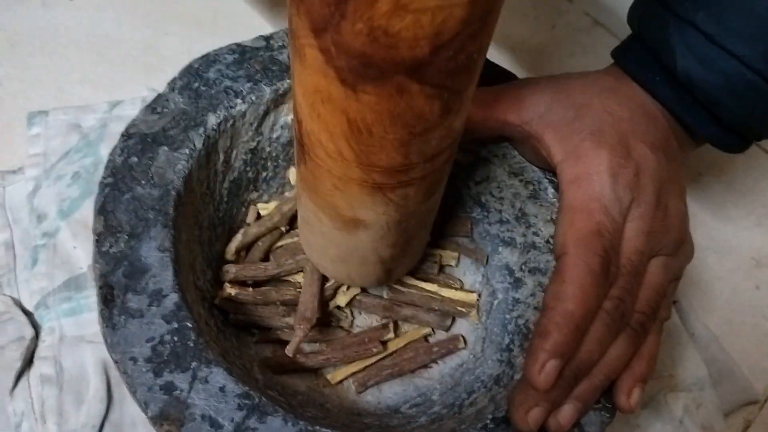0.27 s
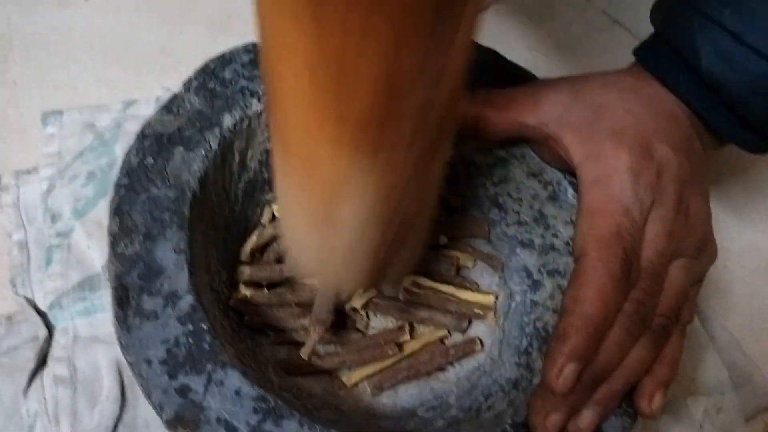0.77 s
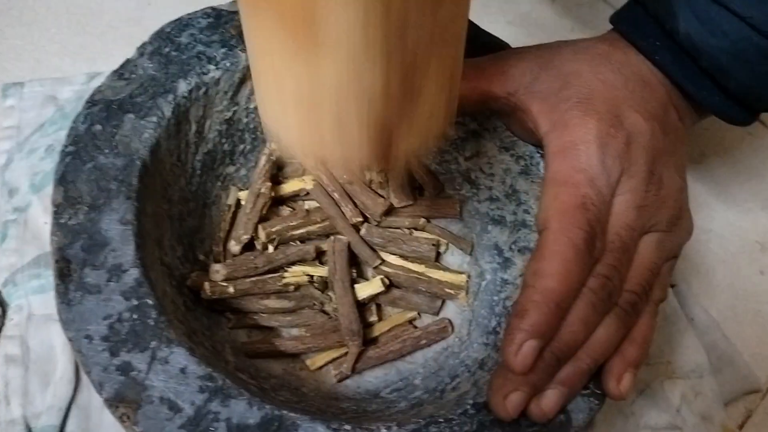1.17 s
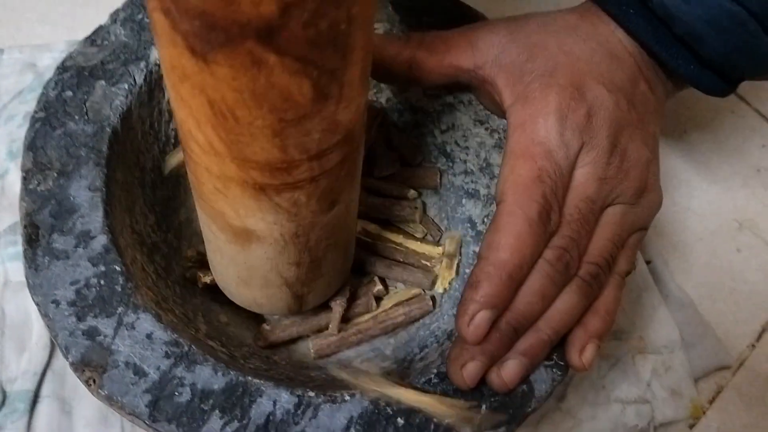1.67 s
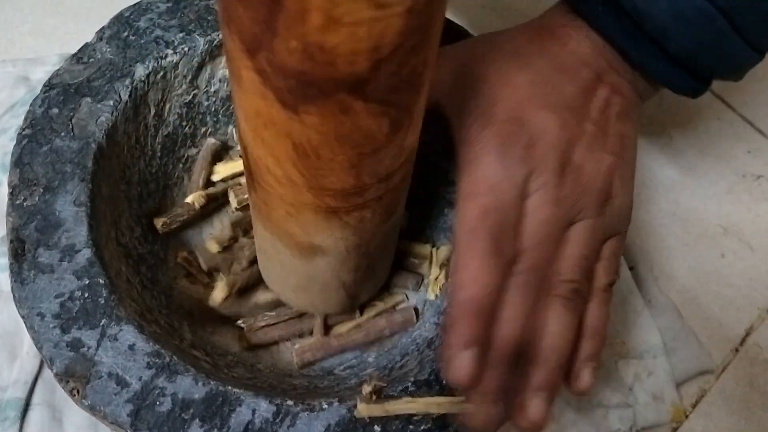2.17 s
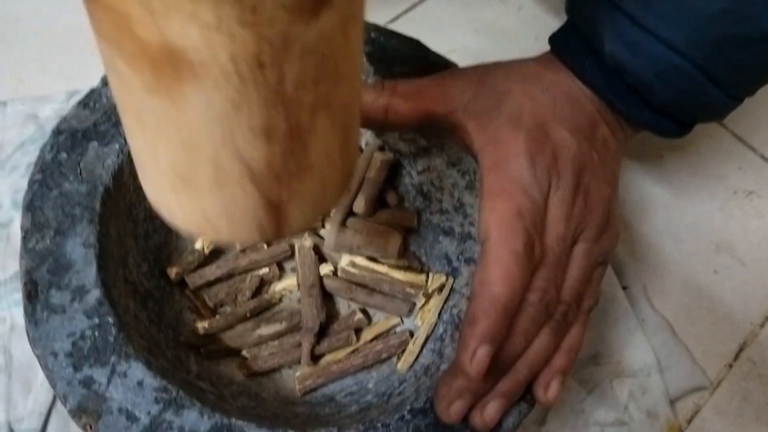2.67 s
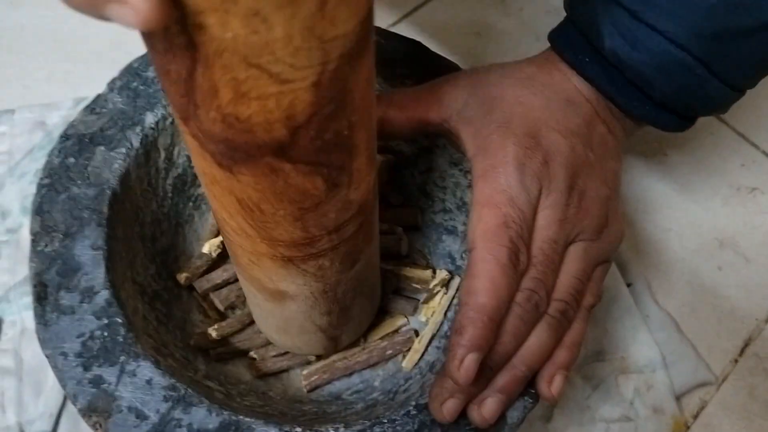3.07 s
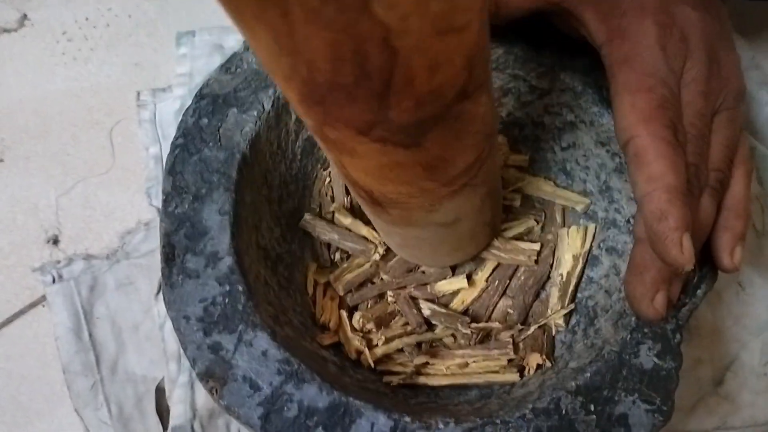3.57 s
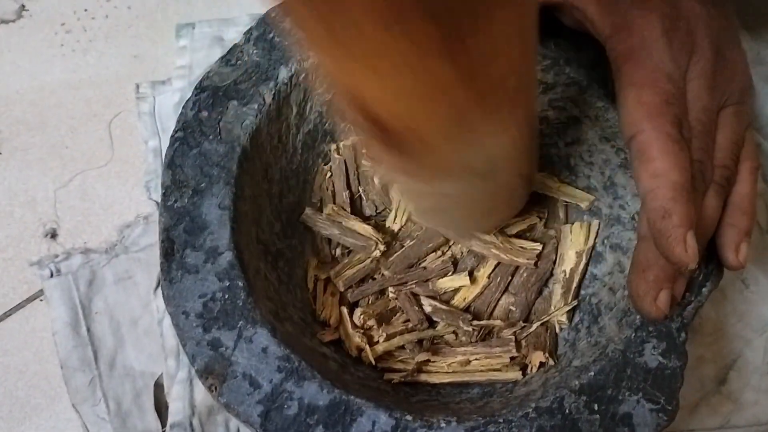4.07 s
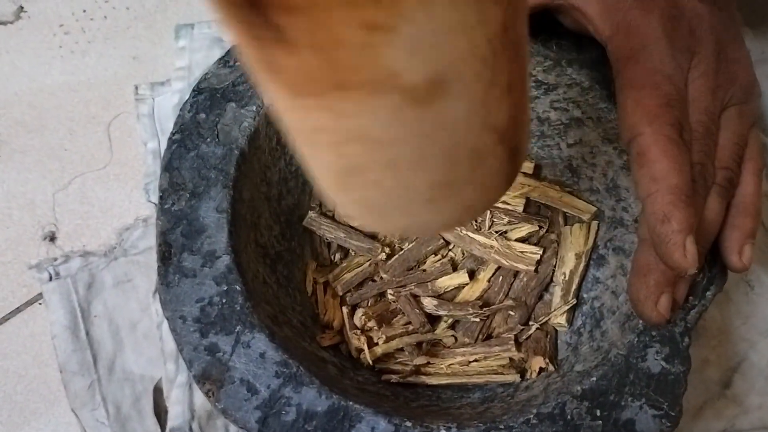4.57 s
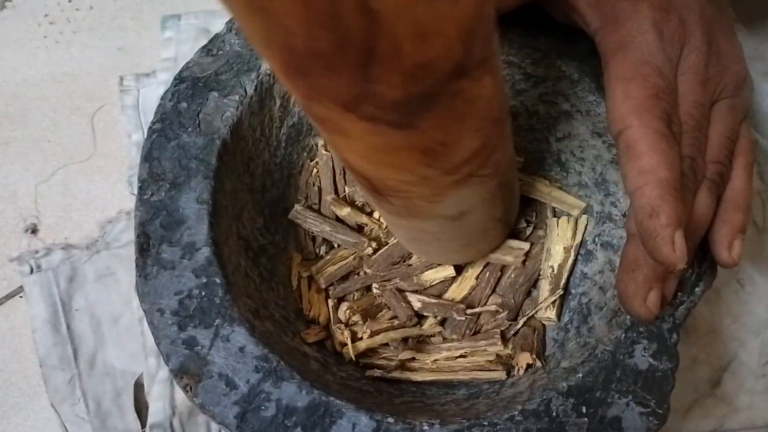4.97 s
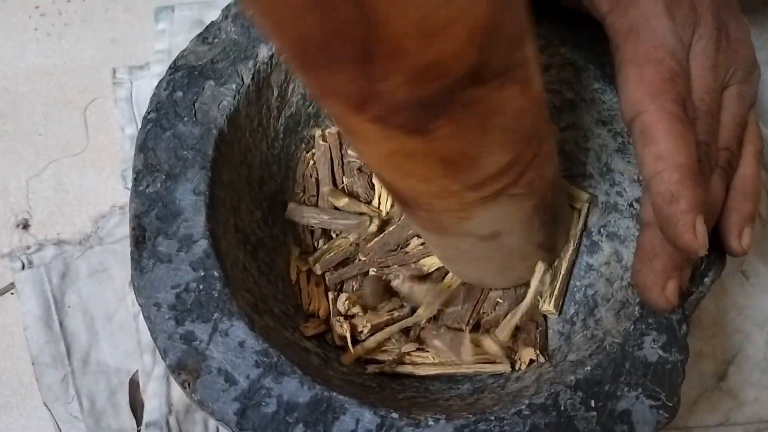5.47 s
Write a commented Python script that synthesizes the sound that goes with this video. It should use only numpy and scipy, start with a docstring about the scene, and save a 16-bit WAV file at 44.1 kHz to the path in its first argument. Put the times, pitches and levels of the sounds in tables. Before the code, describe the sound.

Steady pestle blows crack dry woody sticks in a stone bowl in a hard-walled kitchen, turning fuller and duller after a short dead silence.

```python
"""A hard-walled kitchen: on its floor a heavy wooden pestle pounds dry sticks in a stone mortar, three blows in 2 s.
Each blow is a rustle and crack (dense random clicks), a slap and ringing (decaying sines), and a floor thud (low
sines and noise); a noise tail is the room's answer. Loose sticks clatter over low rumble and soft hiss.
After a silent pause the sticks are splintered and cushion the pestle: shorter, duller cracks and a fuller thud."""
import sys
import numpy as np
from scipy import signal
from scipy.fft import rfft, irfft
from scipy.io import wavfile
from scipy.ndimage import uniform_filter1d, minimum_filter1d

SR = 44100
rng = np.random.default_rng(int(sys.argv[2]) if len(sys.argv) > 2 else 0)


def output_pcm(signal):
    """Save a mono or channel-first signal as 16-bit PCM at the path in sys.argv[1].

    Samples are clipped to [-1, 1] before scaling.
    """
    pcm = np.clip(np.atleast_2d(signal).T, -1, 1) * 32767
    wavfile.write(sys.argv[1], SR, np.round(pcm).astype(np.int16))


N = 252693
TIME = np.arange(N) / SR   # s
AGE = TIME[:SR]   # s since a sound began; each single sound lasts at most 1 s
PAUSE_START_S, PAUSE_END_S = 3.535, 4.056

# the blows; the ring is loud where the pestle gets through to the stone, the slap where it lands flat on the heap;
# levels are relative within each layer: (time [s], crack level [dB], crack t60 [s], slap level [dB],
# knock pitch [Hz], knock level [dB], lingering knock level [dB], ring level [dB], thud level [dB], boom top [Hz])
BLOWS = [ (-.30, -15, .05, -5, 733, -7, -26, -9, -28, 200),
         (0.4160, -16, .035, -3.5, 730.4, -3, -31, -13.5, -32, 199.2),
         (1.141, -14, .069, 4, 702.3, -6.5, -25.5, 1, -33, 195.7),
         (1.7909, -16, .097, -2, 728, -11, -33, 1.5, -32.5, 455),
         (2.4680, -9.5, .027, -12, 713, -12, -36, 4, -29.5, 195.7),
         (3.198, -15, .052, -9, 738.4, -14, -29.5, 4, -24, 261),
         (3.7300, -23, .016, 5, 719, -5.5, -8.5, -38, -15.5, 990),
         (4.3925, -13, .017, 18.5, 725.5, 1, -7, -44, -16.5, 1030),
         (5.0673, -14.5, .0082, 16.5, 699, -1.5, -24.5, -8, -12, 446)]


def from_db(db):
    """Decibels to gain."""
    return 10 ** (np.asarray(db) / 20)


def rms_one(x):
    """Scale to rms 1."""
    return x / np.sqrt(np.mean(x ** 2) + 1e-20)


def fade(t60):
    """An envelope that falls 60 dB in t60 seconds (1 ms at least)."""
    return np.exp(-np.log(1000) * AGE / max(t60, 1e-3))


def butter(x, hz, kind, order):
    """Causal Butterworth filter."""
    sections = signal.butter(order, np.clip(hz, 10, .45 * SR), kind, fs=SR, output="sos")
    return signal.sosfilt(sections, x)


def colour(x, spectrum):
    """Causal (minimum-phase) filter with the given spectrum, by folding its cepstrum."""
    size = 4096
    hz, db = np.transpose(spectrum)
    bins_hz = np.arange(size // 2 + 1) * SR / size
    bins_db = np.interp(np.log(bins_hz + 1), np.log(hz), db)
    cepstrum = irfft(np.log(from_db(bins_db)))
    cepstrum[1:size // 2] *= 2
    cepstrum[size // 2 + 1:] = 0
    impulse = irfft(np.exp(rfft(cepstrum)))
    return signal.fftconvolve(x, impulse[None], axes=1)[:, :x.shape[1]]


def stereo(pair, alike):
    """Two unrelated signals become left and right with the given likeness (correlation)."""
    alike = np.clip(alike, -1, 1)
    middle = np.sqrt(1 + alike) * pair[0]
    side = np.sqrt(1 - alike) * pair[1]
    return (middle + side * [[1], [-1]]) / np.sqrt(2)


def add(track, s, sound):
    """Mix a sound into the track at time s; it may have begun before the track does."""
    start = min(round(s * SR), N - 1)
    sound, start = sound[:, max(-start, 0):], max(start, 0)
    track[:, start:start + sound.shape[1]] += sound[:, :N - start]


def pan(pan_db):
    """Level offsets of left and right, in dB, from their difference."""
    return pan_db * np.array([[.5], [-.5]])


def mode(hz, db, t60, pan_db=0, lag=0, rise_s=0.0018):
    """A struck mode: a decaying sine that reaches the two microphones with different level and phase."""
    swing = np.sin(2 * np.pi * hz * AGE - np.array([[lag], [0]]))   # lag: left, in radians
    return from_db(db + pan(pan_db)) * swing * fade(t60) * (1 - np.exp(-AGE / rise_s))


def burst(grains, envelope):
    """Grains under an envelope, with the energy of that envelope."""
    return rms_one(grains * envelope) * np.sqrt(np.mean(envelope ** 2))


def fractures(spread_db=5.5, per_s=6000, alike=0.35, lag_samples=6):
    """Dense clicks of uneven size from breaking fibres, reaching the right microphone first."""
    # spectrum of breaking sticks: (frequency [Hz], relative level [dB])
    crack_spectrum = [(25, -32), (100, -6), (400, -2), (1100, -3), (2100, -3), (3100, 2.5), (4400, -1),
                      (5200, -4.5), (6000, -5.5), (6450, -20), (7100, -14), (8200, -31), (9500, -41),
                      (15000, -38.5)]
    sizes = from_db(spread_db * np.minimum(rng.exponential(1, (2, SR)), 3))
    sizes = sizes * rng.choice([-1, 1], (2, SR))
    clicks = sizes * (rng.random((2, SR)) < per_s / SR)
    left, right = colour(stereo(clicks, alike), crack_spectrum)
    return np.array([np.roll(left, int(lag_samples)), right])


def first_touch(length_s=.03, swell_db=38.0):
    """The heap rustles louder and louder as the pestle presses into it."""
    swell = from_db(swell_db * np.minimum(AGE / length_s - 1, 0))
    return burst(fractures(), swell * (AGE < length_s))


def crack(crush_s, t60, top_hz, crush_db=1.0):
    """Sticks give way under the pestle in a swelling crackle, which dies away once it bottoms out."""
    swell = from_db(crush_db) * np.minimum(2 * AGE / crush_s, 1)
    dying = np.interp(AGE - crush_s, AGE, fade(t60))
    envelope = np.where(AGE < crush_s, swell, dying)
    return burst(butter(fractures(), top_hz, "low", order=1), envelope)


def slap(lag_s=0.00013):
    """The pestle's flat face slaps the packed heap: heavily damped modes, lagging on the left."""
    # modes of the slap: (frequency [Hz], relative level [dB], t60 [s])
    slap_modes = [(1006, 2, 0.0048), (1360, -6.5, 0.002), (2598, -3.5, 0.0055), (3900, -15, 0.0066),
                  (5270, -13, 0.0016)]
    out = 0
    for k, (hz, db, t60) in enumerate(slap_modes):
        out = out + mode(hz, db, t60, 0, 2 * np.pi * hz * lag_s, rise_s=0.0006) * (-1) ** k
    return out


def hanging_tone(hz, db, pan_db, lag, spread, t60, count=12):
    """A mode's tone hangs on in the room as a cluster of close partials that waver."""
    steps = np.linspace(-1, 1, count) + rng.normal(0, 0.13, count)
    phases = rng.uniform(0, 2 * np.pi, count)
    cluster = sum(np.exp(-step ** 2 + 1j * (2 * np.pi * hz * (1 + spread * step) * AGE + phase))
                  for step, phase in zip(steps, phases))
    sides = np.real(cluster * np.exp(-1j * np.array([[lag], [0]])))
    envelope = fade(t60) * (1 - np.exp(-AGE / 0.037))
    return from_db(db + pan(pan_db)) * burst(sides, envelope) / np.sqrt(2)


def ringing(knock_hz, knock_db, linger_db, ring_db, overtones_db, scatter_db=2.0, overtone_lag=.9,
            bowl_cut_hz=520):
    """Pestle on mortar: quickly damped knock and ring, and faint tones that hang on; gives (stroke, lingering)."""
    # main ring: (frequency [Hz], t60 [s], left over right [dB], left lag [radians])
    ring_hz, ring_t60, ring_pan_db, ring_lag = (1832, 0.058, 2.9, 2.92)
    # overtones of the ring: (frequency [Hz], relative level [dB], t60 [s])
    overtones = [(2380, -8, 0.05), (2656, -2.5, 0.035), (3102, -2, 0.059), (3484, -7.5, 0.056),
                 (3850, -10, 0.049), (4580, -11, 0.044)]
    knock_t60_s, knock_pan_db, knock_lag = 0.066, -3.5, .35   # lag in radians
    knock = mode(knock_hz, knock_db, knock_t60_s, knock_pan_db, knock_lag, rise_s=0.0021)
    stroke = butter(knock, bowl_cut_hz, "high", order=3)   # a small bowl radiates little below its knock
    lingering = hanging_tone(knock_hz, linger_db, knock_pan_db, knock_lag, spread=0.094, t60=0.51)
    stroke += mode(ring_hz, ring_db, ring_t60, ring_pan_db, ring_lag)
    lingering += hanging_tone(ring_hz, ring_db - 30, ring_pan_db, ring_lag, spread=0.023, t60=0.45)
    for (hz, db, t60), chance_db in zip(overtones, rng.normal(0, scatter_db, len(overtones))):
        stroke += mode(hz, overtones_db + db + chance_db, t60, 0, overtone_lag)
    return stroke, lingering


def thud(low_hz, top_hz, modes_db=3.0, boom_db=-0.5, alike=0.63):
    """The floor takes the blow: a few low modes, and a diffuse boom of noise in the room."""
    # the floor under the mortar, before a little random scatter: (frequency [Hz], relative level [dB], t60 [s])
    floor_modes = [(96.16, 2, 0.44), (123.3, -5, .55), (171.5, -13.5, 0.67), (218, -4, 0.39),
                   (265, -9.5, 0.17), (364, -19.5, 0.16), (401, -11.5, 0.18)]
    boom_t60_s = 0.54
    luck = rng.normal(0, 1, (len(floor_modes), 2))
    slab = 0
    for k, ((hz, db, t60), (detune, chance)) in enumerate(zip(floor_modes, luck)):
        slab = slab + mode(hz * (1 + 0.015 * detune), db + 2 * chance, t60, rise_s=0.001) * (-1) ** k
    noise = stereo(rng.standard_normal((2, SR)), alike)
    boom = burst(butter(noise, top_hz, "low", order=3), fade(boom_t60_s))
    return butter(from_db(modes_db) * slab + from_db(boom_db) * boom, low_hz, "high", order=4)


def kitchen(x, gap_s=0.0055, bass_alike=0.28, treble_alike=0.11, split_hz=1000):
    """Hard walls answer with a dense decaying tail, more alike between the sides in the bass."""
    # colour of the room: (frequency [Hz], relative level [dB])
    room_spectrum = [(80, 0), (400, -11.5), (750, -5), (1300, -5), (2000, -5), (3300, -2.5), (6000, -8.5),
                     (8000, -6), (10000, -16)]
    room_t60_s = 0.56
    bass = butter(stereo(rng.standard_normal((2, SR)), bass_alike), split_hz, "low", order=2)
    treble = butter(stereo(rng.standard_normal((2, SR)), treble_alike), split_hz, "high", order=2)
    build_up = np.minimum(AGE / gap_s, 1) ** 2
    tail = rms_one((bass + treble) * fade(room_t60_s) * build_up) / np.sqrt(SR)
    return signal.fftconvolve(x, colour(tail, room_spectrum), axes=1)[:, :N]


def pounding(touch_s=0.02, touch_db=-26.5, slap_room_db=-19.5, ring_room_db=-11.0):
    """Every blow: rustle, crack, slap and ring with their room sound, over the thud."""
    # pairs: (whole sticks before the pause, splinters from its start on)
    crush_lengths_s = (0.0041, 0.0046)   # from first breaking to bottoming out
    crack_tops_hz, crack_rooms_db = (5316, 3215), (-1.5, -1.5)
    overtone_bases_db = (-13, -42.5)   # with the ring at 0 dB
    thud_lows_hz = (72, 154)
    overtones_follow = .42   # dB of overtones per dB of ring
    direct, sent = np.zeros((2, 2, N))
    for (s, crack_db, t60, slap_db, knock_hz, knock_db, linger_db, ring_db, thud_db, boom_top_hz) in BLOWS:
        heap = int(s > PAUSE_START_S)
        crush_s, room_db = crush_lengths_s[heap], crack_rooms_db[heap]
        overtones_db = overtone_bases_db[heap] + overtones_follow * ring_db
        stroke, lingering = ringing(knock_hz, knock_db, linger_db, ring_db, overtones_db)
        rustle = from_db(crack_db + touch_db) * first_touch(touch_s)
        breaking = from_db(crack_db) * crack(crush_s, t60, crack_tops_hz[heap])
        parts = [(s - crush_s - touch_s, rustle, room_db),
                 (s - crush_s, breaking, room_db),
                 (s, from_db(slap_db) * slap(), slap_room_db),   # the bowl beams the slap at the microphones
                 (s, stroke, ring_room_db)]
        for start, sound, send_db in parts:
            add(direct, start, sound)
            add(sent, start, from_db(send_db) * sound)
        add(direct, s, lingering + from_db(thud_db) * thud(thud_lows_hz[heap], boom_top_hz))
    return direct + kitchen(sent)


def background(rumble_alike=.85, hiss_alike=0.075):
    """Low room rumble and a soft hiss, both of coloured noise, sink in a lull timed from each blow."""
    # level of the hiss outside the lulls: (time [s], level [dB])
    hiss_levels = [(0, -57), (.7, -58), (1.1, -60), (3.5, -61.5), (4.06, -52.5), (4.4, -48.5), (5.0, -58),
                   (5.73, -51.5)]
    # spectra of rumble and hiss: (frequency [Hz], relative level [dB])
    rumble_spectrum = [(20, -25.5), (45, -16), (75, -4), (114, 0), (198, -2.5), (260, -13.5), (380, -14.5),
                       (465, -14.5), (500, -2.5), (550, -21), (900, -26), (2000, -63.5)]
    hiss_spectrum = [(410, -35.5), (700, -3.5), (871, -12.5), (962, -3.5), (1180, -7), (1330, -4.5),
                     (2030, -8), (2540, 2), (2870, -4), (3940, -1), (4760, -9.5), (5860, -2), (7510, -17.5),
                     (9760, -51.5), (16500, -120)]
    rumble_over_hiss_db, rumble_lull_db, hiss_lull_db = 3, -8, -6
    delay_s, sink_s, hold_s, return_s = 0.32, 0.22, 0.03, 0.088   # sinking starts once a blow has died away
    corners = np.cumsum([delay_s, sink_s, hold_s, return_s])
    lull = sum(np.interp(TIME - s, corners, [0, 1, 1, 0]) for s, *_ in BLOWS)
    level_db = np.interp(TIME, *np.transpose(hiss_levels))
    rumble = rms_one(colour(stereo(rng.standard_normal((2, N)), rumble_alike), rumble_spectrum))
    hiss = rms_one(colour(stereo(rng.standard_normal((2, N)), hiss_alike), hiss_spectrum))
    rumble_db = level_db + rumble_over_hiss_db + rumble_lull_db * lull
    hiss_db = level_db + hiss_lull_db * lull
    return from_db(rumble_db) * rumble + from_db(hiss_db) * hiss


def loose_sticks(ping_t60=0.012, room_db=-13.0, low_share=0.49):
    """Light clatter: a dry rattle of clicks, thin well below the stick's own brief pitch."""
    # loose sticks shifting and falling back, and at the end the pestle of the next blow first touching the
    # sticks; levels before the room is added: (time [s], rattle level [dB], rattle top [Hz], rattle t60 [s],
    # pitch [Hz], ping level [dB])
    sticks = [ (0.485, -41, 6900, .026, 5120, -41), (1.966, -39, 6000, 0.027, 5250, -31.5),
              (2.811, -35.5, 4480, 0.012, 4040, -21), (5.414, -36.5, 2500, .15, 1770, -26),
              (5.427, -35, 2880, 0.13, 3370, -19), (5.439, -40.5, 3300, 0.43, 3330, -21),
              (5.721, -30.5, 4650, 0.45, 680, -23.5)]
    out = np.zeros((2, N))
    for s, rattle_db, top_hz, t60, hz, ping_db in sticks:
        grains = butter(fractures(), top_hz, "low", order=4)
        grains = butter(grains, low_share * hz, "high", order=3)
        rattle = from_db(rattle_db) * burst(grains, fade(t60))
        add(out, s, rattle + mode(hz, ping_db, ping_t60, 0, 0.65))
    return out + from_db(room_db) * kitchen(out)


def scene():
    """Blows, loose sticks and the room's background; now and then the whole level drops and creeps back."""
    # brief dips of the whole sound: (time [s], level [dB])
    dips = [(1.635, -6.5), (2.104, -5), (2.945, -4.5), (5.545, -12)]
    fall_s, return_s = 0.0057, 0.19
    corners = np.cumsum([0, fall_s, return_s])
    dip_db = sum(np.interp(TIME - s, corners, [0, db, 0]) for s, db in dips)
    return (pounding() + loose_sticks() + background()) * from_db(dip_db)


def record(dry, ceiling=0.98, attack_s=0.0032, release_db_per_s=39.5, cutoff_hz=15750):
    """A limiter ducks peaks over the ceiling and recovers steadily; the pause is silent, the top treble cut."""
    size = max(int(attack_s * SR), 8)
    over_db = 20 * np.log10(np.maximum(np.abs(dry).max(axis=0) / ceiling, 1))
    recovery_db = release_db_per_s * TIME
    duck_db = np.maximum.accumulate(over_db + recovery_db) - recovery_db
    gain = uniform_filter1d(minimum_filter1d(from_db(-duck_db), size), size)   # eases down ahead of a peak
    running = (TIME < PAUSE_START_S) | (TIME > PAUSE_END_S)
    return butter(dry * gain * running, cutoff_hz, "low", order=16)


dry = scene()
out = record(dry)
output_pcm(out)
```